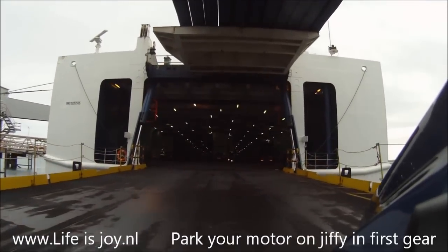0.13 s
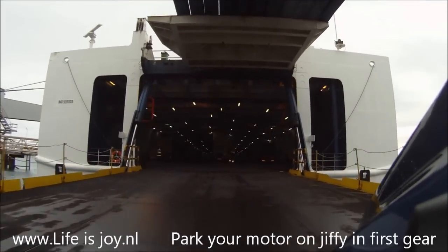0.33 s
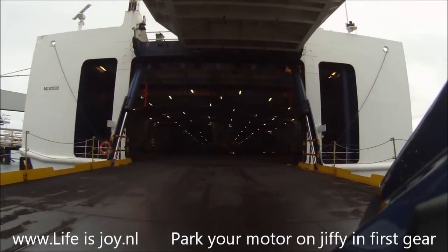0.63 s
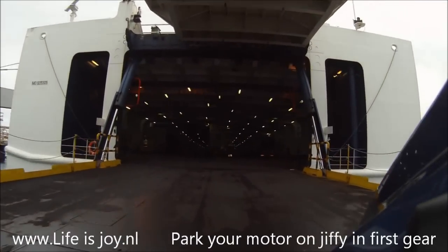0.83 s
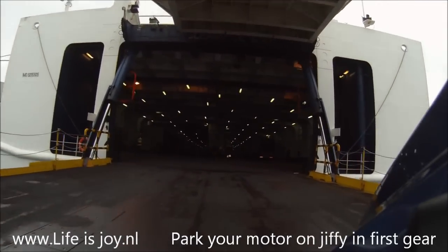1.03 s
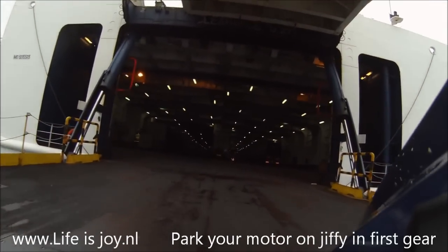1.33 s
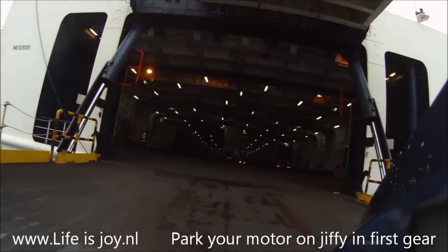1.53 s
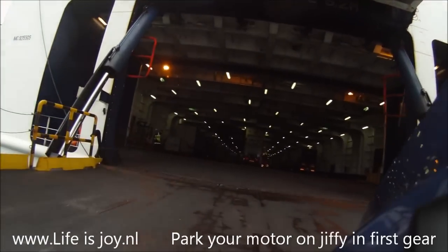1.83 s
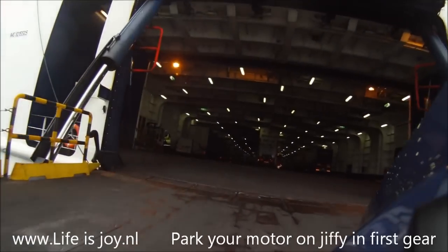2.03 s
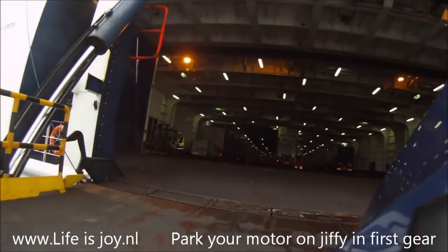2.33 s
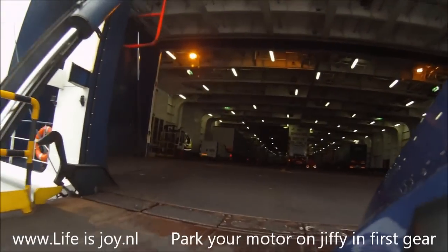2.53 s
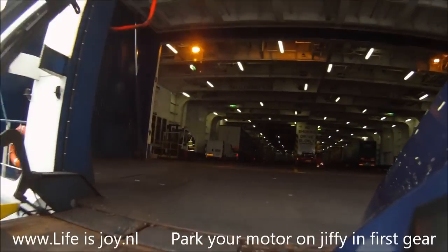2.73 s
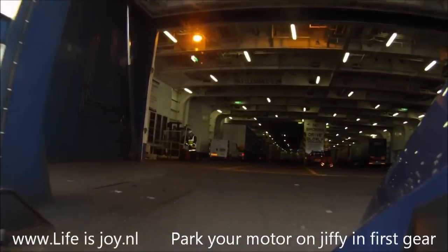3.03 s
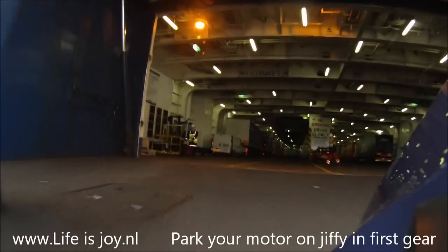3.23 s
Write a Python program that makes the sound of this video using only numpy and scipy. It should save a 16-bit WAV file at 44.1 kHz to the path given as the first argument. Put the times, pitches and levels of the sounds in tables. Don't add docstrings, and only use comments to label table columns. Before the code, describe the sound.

A twin-cylinder motorcycle engine clatters steadily with a pulsing gear whine and mount knocks, a gust moans briefly, then the throttle closes and revs sink on a steel ferry deck; close, muffled microphone on the bike.

```python
import sys
import numpy as np
from scipy import signal
from scipy.fft import rfft, irfft
from scipy.io import wavfile
from scipy.ndimage import uniform_filter1d

SR = 44100
rng = np.random.default_rng(int(sys.argv[2]) if len(sys.argv) > 2 else 0)


def voltage_ratio(decibels):
    exponent = np.asarray(decibels, float) / 20
    return 10 ** exponent


def master_out(mix):
    frames = np.transpose(np.atleast_2d(mix))
    ceiling = np.clip(frames, -1, 1)
    pcm = np.round(ceiling * 32767).astype(np.int16)
    wavfile.write(sys.argv[1], SR, pcm)


N = 149058
T = np.arange(N) / SR

# t/s, level/dB
WIND_LEVEL = [(0.0, -52.5), (0.03, -63.5), (0.89, -64), (1.09, -61.5), (1.12, -53.5), (1.34, -52),
              (1.38, -56.5), (1.55, -56.5), (1.72, -60.5), (2.64, -67), (2.71, -68), (3.13, -69.5),
              (3.17, -70), (3.19, -64), (3.23, -65), (3.38, -67)]
# f/Hz, density/dB per Hz
WASH_SPECTRUM = [(20, -25), (60, -21), (110, -5.5), (220, 0.5), (330, -6), (500, -11.5), (620, -2.5),
                 (800, -9.5)]
# t/s, f/Hz
MOAN_PITCH = [
    (1.1, 236),
    (1.25, 351),
    (1.5, 416),
    (1.8, 426),
]
# t/s, peak level/dB, f/Hz
SHUT_KNOCKS = [(2.2116, -28, 1230), (2.2805, -31.5, 1206), (2.3038, -28, 1370), (2.3486, -39, 1220),
               (2.4195, -28, 1269), (2.4916, -33, 1370), (2.497, -27.5, 1350), (2.565, -32, 1214),
               (2.6494, -39, 1240), (2.7379, -31.5, 1250), (2.83, -32.5, 1280), (2.8806, -31, 1314),
               (2.9312, -29.5, 1270), (3.0836, -32, 1300), (3.118, -40, 1370), (3.1368, -29.5, 1330),
               (3.238, -38, 1090), (3.296, -55, 1360), (3.3257, -31, 1330), (3.351, -33, 1110)]
# t/s, peak level/dB, f/Hz
LOADED_KNOCKS = [(0.028, -27, 1310), (0.0563, -31, 1330), (0.0807, -40, 1240), (0.0922, -36, 1240),
                 (0.2324, -26, 1190), (0.376, -35.5, 1160), (0.4349, -36, 1210), (0.4713, -30, 1370),
                 (0.4959, -23, 1260), (0.5236, -24, 1294), (0.5736, -28, 1270), (0.6934, -31, 1180),
                 (0.7205, -27, 1300), (0.788, -28.5, 1240), (0.8738, -28.5, 1335), (0.9005, -33, 1060),
                 (0.926, -35, 1350), (0.9607, -47, 1240), (1.0201, -31, 1310), (1.1101, -28, 1180),
                 (1.2515, -24.5, 1310), (1.512, -31, 1210), (1.8878, -28, 1240), (1.9834, -28, 1250),
                 (2.0375, -25, 1290), (2.0629, -26, 1070), (2.0858, -26, 1370), (2.1287, -23.5, 1240),
                 (2.1553, -35, 1270)]
# t/s, f/Hz, level/dB, t60/s
HARD_SEAM = [
    (3.1842, 743, -45.5, 0.056),
    (3.1847, 994, -24, 0.026),
    (3.1846, 1316, -22, 0.032),
    (3.187, 145, -54, 0.19),
]
# t/s, f/Hz, level/dB, t60/s
SOFT_SEAMS = [
    (3.268, 600, -49, .05),
    (3.268, 760, -50, .05),
    (2.285, 185, -50, .15),
    (2.285, 290, -54, .1),
    (2.285, 390, -54, .1),
]
# t/s, rate/cycles per s
ENGINE_SPEED = [(0.0, 17.39), (0.3, 17.19), (0.6, 17.14), (0.9, 17.24), (1.2, 17.16), (1.5, 17.24),
                (1.8, 17.1), (2.05, 17.33), (2.2, 16.35), (2.3, 14.48), (2.55, 13.18), (2.75, 11.35),
                (3.0, 9.76), (3.38, 8.4)]
# place/cycle, level/dB
FIRINGS = [(.85, 0)]
# f/Hz, width/Hz, level/dB
PIPE_MODES = [(147, 23, 0), (101, 16, -24), (205, 70, -15)]
# t/s, peak level/dB, f/Hz
OVERRUN_PUFFS = [(2.212, -55, 152), (2.285, -57.5, 145), (2.35, -61, 137), (2.41, -57, 143),
                 (2.485, -59, 137), (2.572, -56.5, 159), (2.655, -70, 138), (2.73, -59.5, 153),
                 (2.87, -60, 160), (2.95, -69, 151), (3.06, -60, 142), (3.13, -57.5, 152),
                 (3.285, -63, 149.4), (3.355, -63, 152)]
# t/s, peak level/dB
SHUT_CLACKS = [(2.21, -34.5), (2.2468, -48), (2.317, -42), (2.347, -35), (2.3855, -41), (2.4204, -35),
               (2.4568, -45), (2.4917, -36), (2.5646, -38), (2.6445, -42.5), (2.7336, -45), (2.819, -41.5),
               (2.8763, -45), (2.9257, -46), (3.0135, -54), (3.0814, -49), (3.1343, -42), (3.228, -48.5),
               (3.292, -50), (3.347, -43.5)]
# t/s, peak level/dB
FRONT_CLACKS = [(0.0015, -35), (0.0575, -37), (0.1168, -39), (0.1757, -39.5), (0.2327, -36), (0.2895, -34),
                (0.347, -36.5), (0.4092, -41.3), (0.4638, -40), (0.5248, -44.6), (0.5808, -38),
                (0.6401, -51), (0.6993, -39), (0.7588, -39), (0.8143, -35.5), (0.8729, -35), (0.9312, -36),
                (0.988, -36), (1.0473, -37), (1.1058, -41.6), (1.1636, -39.7), (1.223, -35), (1.2807, -30),
                (1.3367, -40), (1.3963, -43), (1.4534, -42), (1.5118, -34), (1.5702, -36), (1.6278, -45),
                (1.6868, -39), (1.7436, -39), (1.8022, -32.5), (1.8609, -32.5), (1.919, -32),
                (1.9779, -40.6), (2.0359, -31), (2.0934, -41), (2.1555, -46)]
# t/s, peak level/dB
REAR_CLACKS = [(0.0291, -53), (0.087, -38.5), (0.1454, -39), (0.2045, -37), (0.261, -34.5), (0.3209, -42.6),
               (0.3785, -53), (0.434, -38.9), (0.493, -43), (0.5519, -41), (0.61, -35.5), (0.6695, -38.4),
               (0.7249, -51), (0.7852, -45.0), (0.8435, -44), (0.901, -37), (0.9605, -40), (1.018, -36),
               (1.0764, -37.5), (1.1345, -43), (1.1918, -42), (1.2512, -39), (1.3075, -42.8), (1.367, -38),
               (1.4242, -50), (1.4826, -52), (1.5411, -43), (1.599, -49), (1.6566, -40), (1.7146, -44),
               (1.7735, -48), (1.8312, -39.9), (1.889, -40.7), (1.9478, -43.1), (2.004, -37), (2.0643, -42),
               (2.1213, -45.6), (2.1814, -41)]
TOOTH_MESH = [(.17, .06, 1.0), (.92, .06, -.45), (.36, .09, .5), (.76, .11, -.3)]
# t/s, level/dB
FRAME_SHAKE = [(0.0, -35), (.08, -38.5), (.5, -38), (1.0, -38), (1.3, -37.5), (1.96, -38.5), (2.3, -39),
               (2.7, -41.5), (3.05, -44), (3.38, -43.5)]
# f/Hz, width/Hz, level/dB
BODY_MODES = [(892, 100, -8.5), (1050, 152, -4), (1240, 142, 0), (1370, 144, -2.5), (1477, 160, -6.5),
              (1633, 320, -6), (1881, 140, -14), (2054, 130, -14)]
# f/Hz, width/Hz, level/dB
LID_MODES = [(2436, 390, 3), (2583, 560, 3), (2765, 174, 1.5), (2943, 71, -10), (3226, 290, -2.5),
             (3450, 84, -11)]
# f/Hz, width/Hz, level/dB
LATCH_MODES = [(3875, 820, 0.5), (4117, 102, -0.5), (4260, 360, -4), (4764, 280, 2.5), (5066, 380, -2)]
# f/Hz, width/Hz, level/dB
LEAK_MODES = [(5485, 180, -4), (5750, 160, -5), (6410, 730, -0.5), (7020, 240, -5), (7530, 630, -5.5),
              (8430, 1300, 2), (9520, 3100, 0.5), (11580, 1400, -6.5), (12500, 1600, -11.5),
              (14500, 1200, -6)]
# place/cycle, level over clatter/dB, decay/cycles
BODY_BLOWS = [(.93, 5, .14), (.44, 6, .13), (.28, 2, .07), (.83, 1, .04)]
SHELL_BLOWS = [(0.874, 1.5, 0.66), (0.56, 1.6, 0.07)]
LID_BLOWS = [(.95, 3, .06), (.45, 2, .04), (.28, 2, .04)]
LATCH_BLOWS = [(.79, 6, .1), (.32, 1, .04), (.52, -1, .1)]
LEAK_BLOWS = [(.04, 6.1, 0.33), (.55, 5.7, 0.5)]

START_CYCLES = -.068
SHUT_S, SHUT_LEN_S = 2.216, .095


def evened(x):
    return x / np.sqrt(np.mean(x ** 2) + 1e-20)


def curve(points):
    return np.interp(T, *np.transpose(points))


def highpass(x, order, edge_hz):
    return signal.sosfilt(signal.butter(order, edge_hz, "high", fs=SR, output="sos"), x)


def resonate(x, f_hz, width_hz):
    turn = np.exp(2j * np.pi * np.cumsum(f_hz * np.ones(N)) / SR)
    r = np.exp(-np.pi * width_hz / SR)
    return 2 * (turn * signal.lfilter([(1 - r) ** 2], [1, -2 * r, r * r], x / turn)).real


def through(x, modes):
    return sum((-1) ** k * voltage_ratio(db) / np.sqrt(width_hz) * resonate(x, f_hz, width_hz)
               for k, (f_hz, width_hz, db) in enumerate(modes))


def drift(rate_hz):
    rates_hz = np.geomspace(rate_hz / 20, rate_hz, 20)
    return evened(sum(np.sin(2 * np.pi * (f * T + rng.random())) / np.sqrt(f) for f in rates_hz))


def per_cycle(turns, spread_db):
    return voltage_ratio(spread_db * rng.standard_normal(99))[np.floor(turns).astype(int) + 9]


def add(mix, start_s, sound):
    part = mix[int(start_s * SR):][:len(sound)]
    part += sound[:len(part)]


def burst(rows, length_s):
    out = np.zeros(N)
    t = np.arange(0, 10 * length_s, 1 / SR)
    swell = t / length_s * np.exp(1 - t / length_s)
    for start_s, db, *f_hz in rows:
        tone = np.sin(2 * np.pi * f_hz[0] * t) if f_hz else 1
        add(out, start_s, voltage_ratio(db) * swell * tone)
    return out


def wind():
    wash_top_db, gust_from_db = -62.5, -63
    hz, (f_hz, db) = np.fft.rfftfreq(N, 1 / SR), np.transpose(WASH_SPECTRUM)
    colour = voltage_ratio(np.interp(np.log(hz + 1), np.log(f_hz), db, right=-99))
    wash = evened(irfft(rfft(rng.standard_normal(N)) * colour, N))
    level_db = curve(WIND_LEVEL) + .72 * drift(29.87)
    voices = [(curve(MOAN_PITCH), 28, -8), (590, 30, -8), (505, 1070, 1)]
    gust = sum(voltage_ratio(db) * evened(resonate(rng.standard_normal(N), f_hz, width_hz))
               for f_hz, width_hz, db in voices)
    gust = highpass(gust, 3, 220)
    gust_open = np.clip((level_db - gust_from_db) / 8, 0, 1)
    return voltage_ratio(np.minimum(level_db, wash_top_db)) * wash + voltage_ratio(level_db) * gust_open * gust


def coasting(turns, shut):
    teeth_per_cycle, start_db, fade_db_per_s = 52, -66, -22
    level_db = start_db + fade_db_per_s * (T - SHUT_S) + 2.2 * drift(30)
    return shut * voltage_ratio(level_db) * np.cos(2 * np.pi * teeth_per_cycle * turns + 2.2 * drift(30))


def tyres(shut):
    return shut * voltage_ratio(-77) * evened(resonate(rng.standard_normal(N), f_hz=85, width_hz=70))


def exhaust(turns, shut):
    thump_db, thump_spread_db, thump_shut_db = -57, .5, -30
    rumble_db, rumble_shut_db, fade_db_per_s = -16, 1, 1
    pulses = 0
    for at, db in FIRINGS:
        fires = np.diff(np.floor(turns - at), prepend=-2)
        pulses = pulses + voltage_ratio(db) * per_cycle(turns - at, thump_spread_db) * fires
    thumps = voltage_ratio(thump_shut_db * shut) * evened(through(pulses, PIPE_MODES))
    rumble = evened(through(rng.standard_normal(N), PIPE_MODES))
    pipe = highpass(thumps + voltage_ratio(rumble_db + rumble_shut_db * shut) * rumble, 4, 92)
    level_db = thump_db + fade_db_per_s * np.maximum(T - SHUT_S, 0)
    return voltage_ratio(level_db) * pipe + burst(OVERRUN_PUFFS, length_s=.017)


def seams():
    out, rise_s = np.zeros(N), .0007
    for start_s, f_hz, db, t60_s in HARD_SEAM + SOFT_SEAMS:
        t = np.maximum(T - start_s, 0)
        rise = (1 - np.exp(-t * min(1 / rise_s, f_hz))) ** 2
        out += rise * voltage_ratio(db - 60 * t / t60_s) * np.sin(2 * np.pi * f_hz * t)
    return out


def mount():
    rough = 1 + .29 * evened(resonate(rng.standard_normal(N), f_hz=138, width_hz=210))
    knocks = voltage_ratio(-2) * burst(SHUT_KNOCKS, length_s=.0022)
    knocks = knocks + voltage_ratio(-5.5) * burst(LOADED_KNOCKS, length_s=.0019)
    return highpass(rough * knocks, 6, 850)


def valves():
    ring = evened(sum(voltage_ratio(db) * np.sin(2 * np.pi * f_hz * T + 3 * drift(60))
                      for f_hz, _, db in LID_MODES))
    clacks = voltage_ratio(-5) * burst(SHUT_CLACKS, length_s=.0028)
    return ring * (clacks + voltage_ratio(-6) * burst(FRONT_CLACKS + REAR_CLACKS, length_s=.0018))


def gear_whine(turns):
    tone_hz, wander_rad, level_db, unloaded_db = 879, 1.3, -42, -65
    load_off_s, load_off_len_s = 2.185, .04
    chain_cycles, chain_at_cycles, chain_db = 4.12, .35, 1.6
    press = 0
    for at, length, strength in TOOTH_MESH:
        place = turns - at + .5
        swell = np.exp(-.5 * ((place % 1 - .5) / length) ** 2)
        press = press + strength * per_cycle(place, spread_db=.8) * swell
    tone = np.cos(2 * np.pi * tone_hz * T + wander_rad * drift(12))
    pull_db = chain_db * np.cos(2 * np.pi * (turns - chain_at_cycles) / chain_cycles)
    unloaded = np.clip((T - load_off_s) / load_off_len_s + .5, 0, 1)
    return voltage_ratio(level_db + pull_db + unloaded_db * unloaded) * evened(press * tone)


def clatter(turns, shut, modes, blows, db, shut_db, blow_shut_db, per_s, grain_db, spread_db):
    sizes = voltage_ratio(grain_db * np.minimum(rng.exponential(1, N), 2.5))
    ticks = (rng.random(N) < per_s / SR) * sizes * rng.standard_normal(N)
    power = 0
    for at, blow_db, decay in blows:
        fall = np.exp(-((turns - at) % 1) / decay)
        power = power + (voltage_ratio(blow_db) * per_cycle(turns - at, spread_db) * fall) ** 2
    blow_power = voltage_ratio(blow_shut_db * shut) ** 2 * uniform_filter1d(power, size=220)
    bunch = voltage_ratio(shut_db * shut) ** 2 + blow_power
    return voltage_ratio(db) * evened(through(ticks * np.sqrt(bunch), modes))


def housing(turns, shut):
    parts = [  # modes, blows, dB, shut dB, blow shut dB, ticks per s, grain dB, spread dB
        (BODY_MODES[:5], BODY_BLOWS, -2, -.5, -7, 30000, -3, 1.2),
        (BODY_MODES[5:], SHELL_BLOWS, -11, -4.5, 1.9, 12000, -.5, .3),
        (LID_MODES, LID_BLOWS, -12.5, -2.5, 4.5, 14000, -3.5, -1),
        (LATCH_MODES, LATCH_BLOWS, -16, -2.2, -.5, 11000, 2, 1.5),
        (LEAK_MODES[:7], LEAK_BLOWS, -28.5, -1.3, -1.5, 39000, -7.5, .5),
        (LEAK_MODES[7:], LEAK_BLOWS, -37.5, -4, -1.5, 20000, 4, .8)]
    return voltage_ratio(curve(FRAME_SHAKE)) * sum(clatter(turns, shut, *part) for part in parts)


def scene():
    turns = START_CYCLES + np.cumsum(curve(ENGINE_SPEED)) / SR
    shut = np.clip((T - SHUT_S) / SHUT_LEN_S + .5, 0, 1)
    mix = wind() + coasting(turns, shut) + tyres(shut) + exhaust(turns, shut)
    mix = mix + seams() + mount() + valves()
    frame = highpass(gear_whine(turns) + housing(turns, shut), 8, 830)
    return (mix + frame)[None]


def low_pass(x):
    return signal.sosfilt(signal.butter(12, 16010, fs=SR, output="sos"), x)


def record(dry):
    edge = signal.firwin(801, 15250, window=("kaiser", 9), fs=SR)
    mix = signal.oaconvolve(dry, edge[None], "same")
    return low_pass(mix)


dry = scene()
out = record(dry)
master_out(out)
```